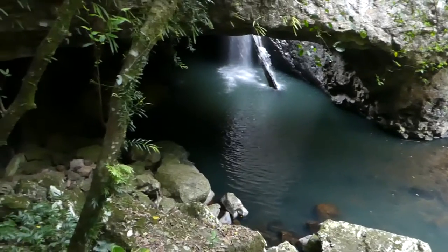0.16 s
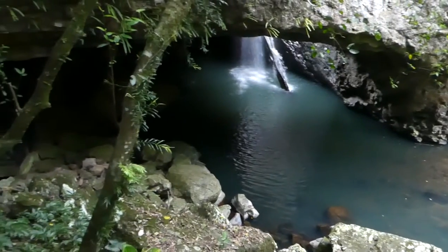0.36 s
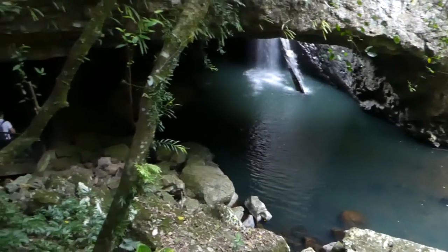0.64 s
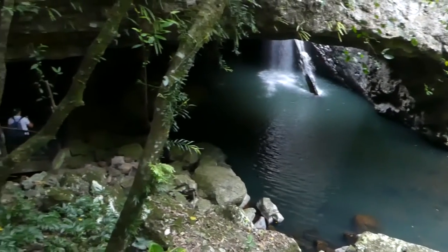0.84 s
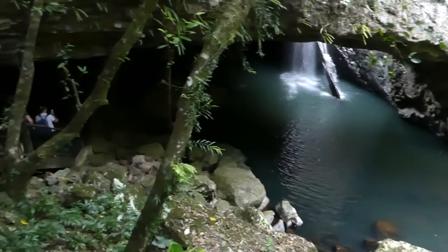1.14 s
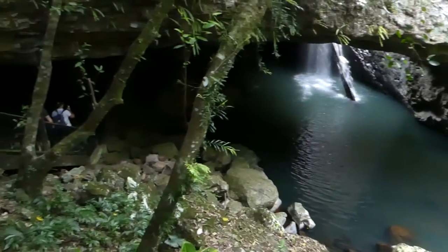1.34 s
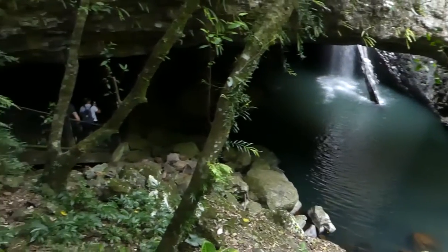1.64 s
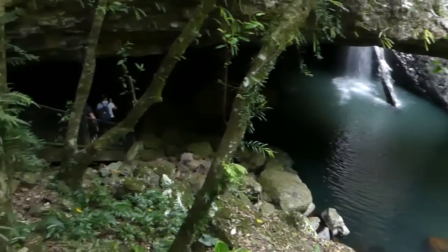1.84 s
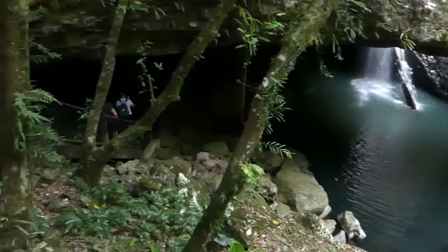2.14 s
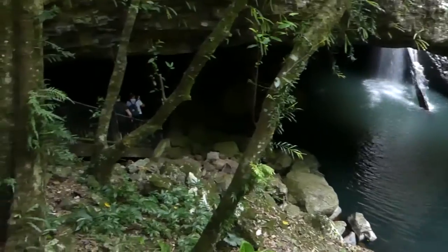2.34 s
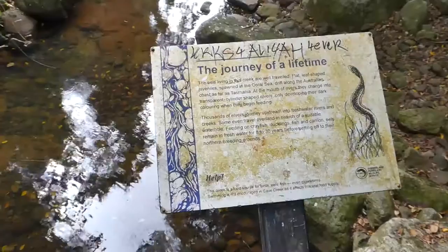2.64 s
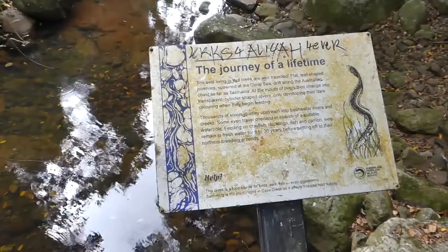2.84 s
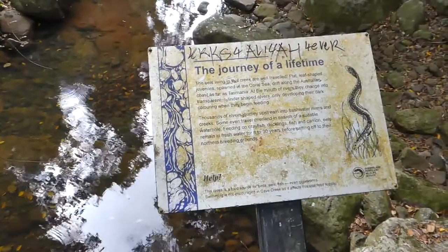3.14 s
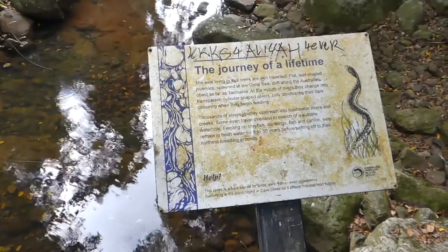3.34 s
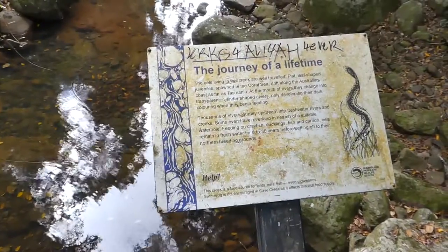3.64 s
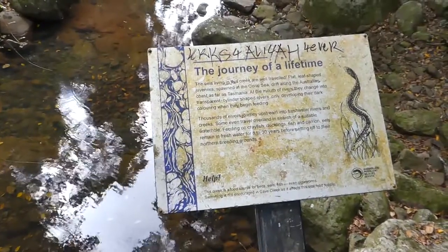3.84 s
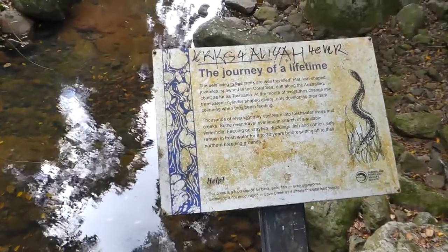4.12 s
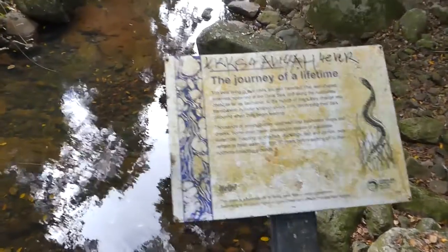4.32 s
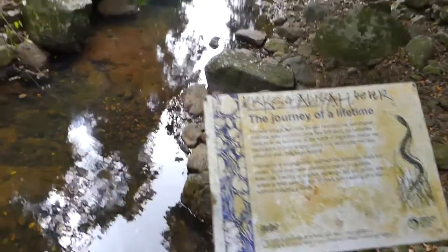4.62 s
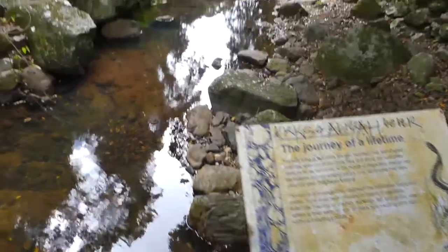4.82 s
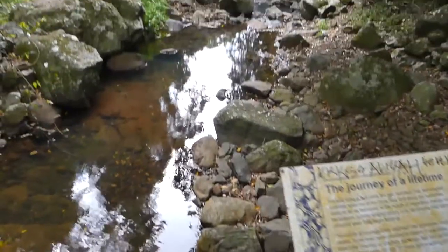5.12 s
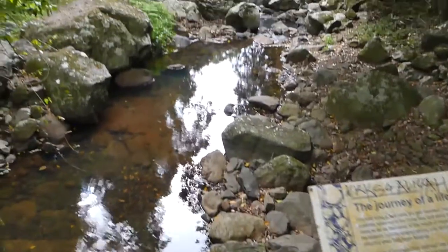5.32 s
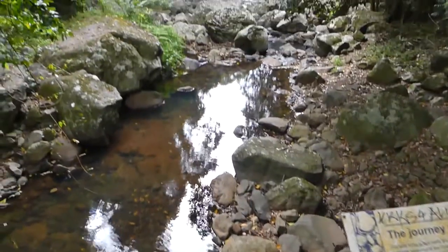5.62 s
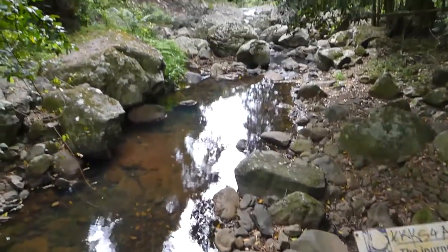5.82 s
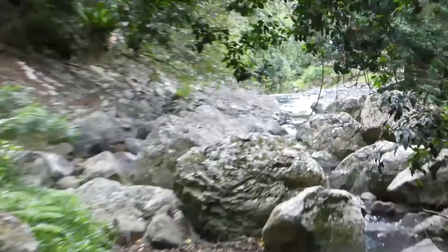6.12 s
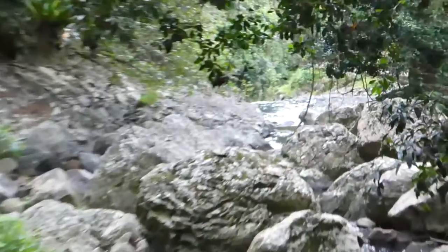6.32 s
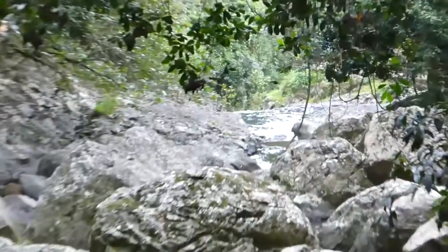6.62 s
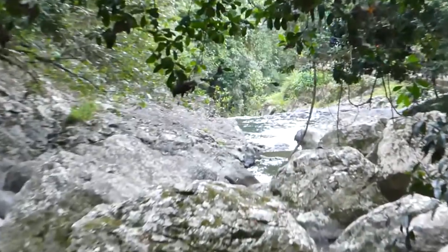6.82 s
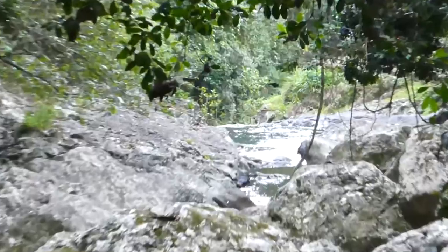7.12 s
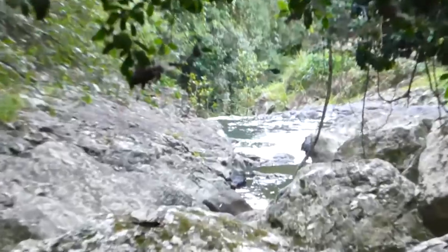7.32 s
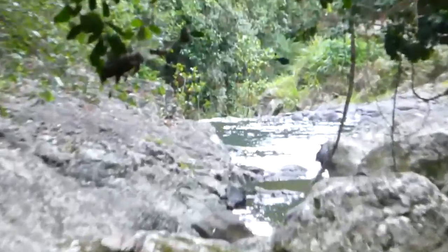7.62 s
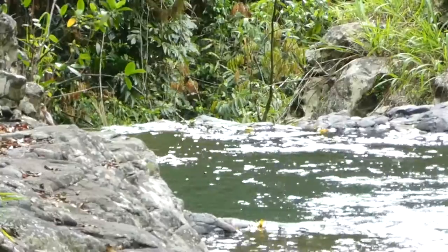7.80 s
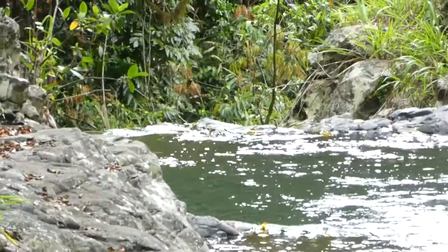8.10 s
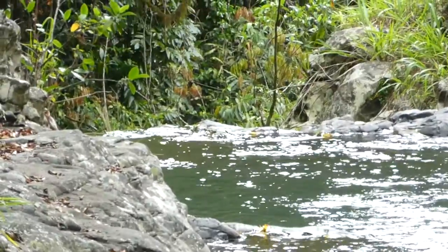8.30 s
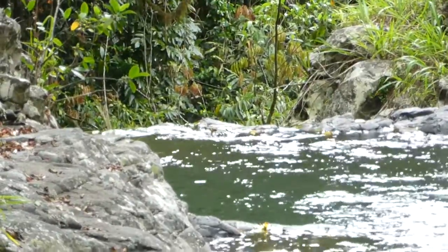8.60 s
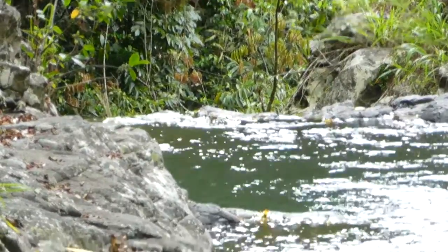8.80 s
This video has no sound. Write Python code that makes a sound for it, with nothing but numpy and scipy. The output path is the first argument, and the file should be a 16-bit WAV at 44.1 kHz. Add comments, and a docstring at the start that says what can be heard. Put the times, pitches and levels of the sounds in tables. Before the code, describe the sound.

A steady, loud waterfall drums into a cave pool with bright hissing spray and small bubbly slaps, drifting slightly right. It cuts off abruptly into a short silence. A far quieter rocky stream then starts suddenly, rushing softly with gurgles, round plops and small sloshes. One short dry knock comes midway, then the water sounds hollow and filtered for a while before opening up again. Outdoors, stereo microphone.

```python
"""A creek in the bush: first a waterfall in a cave, then open water among rocks.
The fall drums in its pool and hisses with spray, both made of patchy noise and swarms of ringing bubbles.
It stops, and after a short silence a stream rushes in, made the same way, with gulps, sloshes and one knock.
A faint high hiss comes twice. During the second, the stream turns hollow and a few narrow bands stand out;
a very faint low rumble of air also begins there and stays to the end."""
import sys
import numpy as np
from scipy import signal
from scipy.fft import rfft, irfft, next_fast_len
from scipy.io import wavfile
from scipy.ndimage import uniform_filter1d, map_coordinates

SR = 44100
rng = np.random.default_rng(int(sys.argv[2]) if len(sys.argv) > 2 else 0)


def transcribe(signal):
    """Save signal, clipped to [-1, 1], as a 16-bit WAV file at the path in sys.argv[1]."""
    frames = np.atleast_2d(signal).T
    limited = np.clip(frames, -1, 1)
    pcm = np.round(limited * 32767).astype(np.int16)
    wavfile.write(sys.argv[1], SR, pcm)


N = 394694

# Tone of the water drumming in the cave pool: pitch_hz, level_db (relative)
POOL_TONE = [(25, -54.5), (60, -46.5), (100, -25), (200, -12), (320, -4.3), (430, -6), (540, 1.7),
             (690, 2.7), (800, 0.5), (880, -0.4), (1100, -0.5), (1430, -29.5), (2400, -120)]
# Tone of the hissing spray: pitch_hz, level_db (relative)
SPRAY_TONE = [(650, -39.5), (1100, -5), (1450, -3.5), (1800, -4), (2200, -1.3), (2900, 0.26), (4000, -2),
              (5850, -4), (7980, -8.5), (9740, -4.5), (12000, -12.5), (14000, -19), (15500, -25.5)]
# Surges of the spray: time_s, level_db (over its usual level)
SPRAY_SURGES = [(0.05, 0.1), (.16, 0), (.33, 0.2), (.49, 0.5), (.65, 0.4), (.755, 1.5), (.88, -0.3),
                (.95, 0.6), (1.04, -.5), (1.17, 0.5), (1.36, .5), (1.5, -0.5), (1.61, 0.3), (1.79, 0.45),
                (2.17, -0.6), (2.28, -0.4), (2.37, .5), (2.46, -0.3)]
# How wide the cave sounds: pitch_hz, side_minus_mid_db
CAVE_WIDTH = [(60, 8.5), (99, 1.5), (160, 0), (270, -7), (450, -10), (740, -13.5), (1220, -9.5),
              (2010, -10.5), (3330, -12.5), (5500, -10.5), (9080, -12), (15000, -2)]
# Heavy clumps of water slapping the pool: start_s, starting_pitch_hz, peak_db
POOL_SLAPS = [(.042, 2430, -25), (.213, 3886, -31), (.348, 1421, -26), (1.164, 2121, -26.5),
              (1.203, 1916, -32), (1.271, 1162, -29), (1.338, 2830, -25), (1.437, 1760, -29),
              (1.630, 2400, -28.5), (1.821, 4231, -31.5)]
# Tone of the stream over rocks: pitch_hz, level_db (relative)
STREAM_TONE = [(25, -41), (65, -28), (123, -14), (200, -6.5), (315, -3), (520, -0.5), (900, -1.5),
               (1440, -4), (2800, -6), (4900, -11), (6800, -16.5), (8100, -21), (9900, -20.5), (12500, -30),
               (15500, -37.5)]
# How wide the creek sounds: pitch_hz, side_minus_mid_db
CREEK_WIDTH = [(60, 7), (110, 4), (200, 2), (380, -4.5), (700, -7.5), (1290, -8.5), (2380, -10),
               (4400, -10), (8120, -8.5), (15000, -2)]
# Strength of the stream, before its flutter: time_s, level_db
STREAM_FLOW = [(2.85, -39.5), (4.2, -39.0), (4.7, -39.5), (5.5, -39), (6.1, -38.5), (7.3, -39.5),
               (7.8, -39), (8.9, -39.5)]
# Small waves folding over rocks: start_s, length_s, centre_pitch_hz, spread_octaves, level_db
WAVE_FOLDS = [(3.55, .16, 2700, .08, -52), (5.859, .1, 1520, 0.66, -48), (6.524, 0.074, 1740, 0.15, -45.5),
              (6.628, .15, 1710, 0.086, -50), (6.69, .08, 400, 0.18, -52), (6.788, 0.065, 960, .08, -54),
              (6.914, .06, 1420, .04, -50), (7.169, 0.052, 930, 0.195, -46), (7.76, 0.14, 2220, 0.14, -51),
              (7.924, 0.036, 876, 0.28, -41.5), (8.032, .16, 1096, 0.2, -57),
              (8.192, 0.083, 626, 0.19, -51), (8.35, 0.18, 515, 0.077, -50.5),
              (8.578, .12, 1580, 0.23, -48)]
# Tone of the faint high hiss: pitch_hz, level_db (relative)
HISS_TONE = [(4000, -51.5), (9000, -9.5), (12000, 1.5), (15500, -8.0)]
# Large air pockets closing: start_s, starting_pitch_hz, peak_db, fall_by_60_db_s
AIR_POCKETS = [(4.521, 1404, -41, .07), (4.837, 860, -41, .07), (4.948, 890, -39, .06),
               (5.210, 970, -38, .06), (5.212, 1100, -42, .06), (5.245, 485, -40, .06),
               (5.308, 1085, -41, .11), (5.352, 552, -39, .08), (5.362, 1140, -41, .07),
               (5.433, 330, -40, 0.096), (5.450, 670, -40, .06), (5.690, 650, -36, 0.054),
               (5.885, 684, -39, .08), (6.042, 1390, -42, .09), (6.136, 325, -36.5, 0.093),
               (6.266, 402, -38, .06), (6.269, 193, -39, 0.14), (6.325, 225, -42, .07),
               (6.485, 590, -38, .05), (6.537, 1435, -40, .08), (6.670, 434, -35, .09),
               (6.773, 560, -37, .05), (6.789, 345, -44, .06), (7.073, 212, -38, 0.045),
               (7.076, 450, -38, .05), (7.178, 640, -37, .06), (7.180, 903, -34, 0.093),
               (7.188, 2080, -40, .05), (7.530, 1020, -38, .08), (7.702, 192, -46, 0.087),
               (7.755, 1112, -36.5, .06), (7.844, 344, -41, 0.055), (7.929, 703, -39, .06),
               (7.934, 982, -36, 0.076), (7.966, 298, -42, .09), (7.967, 876, -43, .06),
               (8.046, 1150, -42, .06), (8.138, 1150, -41, .07), (8.245, 644, -41, .13),
               (8.395, 490, -40, .12), (8.424, 516, -44, .13), (8.654, 1435, -43, .07)]
# What the knock rings with: pitch_hz, level_db (relative), fall_by_60_db_s
KNOCK_RINGS = [(840, -6, 0.022), (1100, -12, .01), (1690, -4, .016), (2600, -9, .006)]
# Overall tone of the knock: pitch_hz, gain_db
KNOCK_TONE = [(120, -40), (700, -1), (2000, -1), (7000, -14), (12000, -34.5)]
# Tone of the low rumble: pitch_hz, level_db (relative)
RUMBLE_TONE = [(20, -2), (55, -2), (120, -2.0), (400, -60), (1000, -120)]
# Broad scoop of the hollow colour: pitch_hz, gain_db
HOLLOW_SCOOP = [(90, -1), (150, -7.5), (210, -3.5), (610, -3.5), (670, -13), (1270, -10.5), (1700, -10),
                (2100, -10.5), (2380, -19), (3000, -19), (3850, -20), (4300, -17.5), (4850, -19.5),
                (5060, -5), (5350, -3), (5630, -9), (5850, -3), (7500, -2), (14000, -2)]
# Narrow bands left standing in the scoop: centre_pitch_hz, width_hz, added_gain_db
HOLLOW_RIDGES = [(954, 70, 7), (1450, 49, 7.6), (5260, 93, 2.5), (12900, 500, 3.5)]

FALL_END, CREEK_START, KNOCK_START = 2.569, 2.845, 5.9535  # seconds
HOLLOW_START, HOLLOW_END = 6.023, 7.64  # seconds
TOP_HZ = 15550  # almost nothing is heard above this
POOL_DB, SPRAY_DB = -33, -23.5
FLUTTER_DB = 0.43  # quick chance wavering of the stream


def amp(db):
    """Turns decibels into a gain."""
    return 10 ** (np.asarray(db) / 20)


def unit(x):
    """Scales a sound to an average (rms) strength of 1."""
    return x / np.sqrt(np.mean(x ** 2) + 1e-20)


def along(points, hz):
    """Reads a curve of (pitch, value) points on a log pitch axis."""
    f, v = np.transpose(points)
    return np.interp(np.log(hz + 1), np.log(f + 1), v)


def over_time(points):
    """Reads a curve of (time, value) points at every sample."""
    return np.interp(np.arange(N) / SR, *np.transpose(points))


def ramp(start, length):
    """Rises from 0 to 1 over a length in seconds."""
    return np.clip((np.arange(N) / SR - start) / length, 0, 1)


def wobble(rate):
    """A smooth random curve with a new random point rate times a second."""
    points = rng.standard_normal(int(N * rate / SR) + 4)
    return map_coordinates(points, [np.arange(N) * rate / SR])


def filtered(x, response):
    """Changes the strength of each pitch in a sound by a given response."""
    m = next_fast_len(N + 8192)
    return irfft(rfft(x, m) * response(np.fft.rfftfreq(m, 1 / SR)), m)[..., :N]


def churn(patchy_db):
    """White mid and side noise whose bands swell and sink in patches, as jets of water break up."""
    bands = signal.stft(rng.standard_normal((2, N)), nperseg=512)[2]
    patches = rng.standard_normal(bands.shape[1:])
    patches = uniform_filter1d(patches, size=5, axis=0)  # smooth over pitch
    patches = uniform_filter1d(patches, size=10, axis=1)  # smooth over time
    depth = patchy_db / (1 + np.arange(len(patches)) / len(patches) * 2)  # fine spray is smoother
    gain = amp(depth[:, None] * unit(patches))
    return unit(signal.istft(bands * gain, nperseg=512)[1][:, :N])


def bubbles(count, low_hz, high_hz, cycles, spread_db):
    """Mid and side of a swarm of bubbles: each rings for some cycles and rises in pitch."""
    when, bore, size, place, life = rng.random((count, 5)).T[..., None]
    hz = low_hz * (high_hz / low_hz) ** bore
    step = np.arange(int(np.clip(2 * cycles * SR / low_hz, 16, 4e6 / count)))
    turns = hz * step / SR
    age = turns / (cycles * (.5 + life))
    tone = np.sin(2 * np.pi * turns * (1 + 0.034 * np.minimum(age, 2)))
    ring = tone * np.exp(-3 * age) * (1 - np.exp(-turns))  # soft start, then dying away
    ring *= amp(-spread_db * np.log(np.maximum(size, .01)))
    at = ((when * N).astype(int) + step).ravel()
    mid = np.bincount(at, ring.ravel(), N)[:N]
    side = np.bincount(at, (ring * (place - .5)).ravel(), N)[:N]
    return np.array([unit(mid), unit(side)])


def stereo(pair, spectrum, width):
    """Colours a mid and side pair and turns it into left and right, mid at rms 1."""
    def response(hz):
        return amp(along(spectrum, hz)) * np.array([np.ones_like(hz), amp(along(width, hz))])
    mid, side = filtered(pair, response)
    return np.array([mid + side, mid - side]) / np.std(mid)


def waterfall():
    """The falling column drums in the pool; its spray hisses in uneven surges; both drift to the right."""
    surge_db = over_time(SPRAY_SURGES) + 0.49 * wobble(22.03)
    pool = churn(patchy_db=0.13)
    pool += amp(-22.5) * bubbles(count=2500, low_hz=203.5, high_hz=1103, cycles=10, spread_db=1.5)
    spray = churn(patchy_db=0.97)
    spray += amp(-13.5) * bubbles(count=20000, low_hz=1170, high_hz=11700, cycles=2.35, spread_db=-0.5)
    clumps = amp(-19.0) * bubbles(count=1500, low_hz=990, high_hz=4130, cycles=10.3, spread_db=1)
    low = amp(POOL_DB + 0.13 * wobble(8.8)) * stereo(pool, POOL_TONE, CAVE_WIDTH)
    high = amp(SPRAY_DB + surge_db) * stereo(spray + clumps, SPRAY_TONE, CAVE_WIDTH)
    drift = np.array([[-1], [1]]) * ramp(0, FALL_END)  # left sinks, right grows
    return low * amp(0.87 * drift) + high * amp(.6 * drift)


def slaps(life=.05, attack=.003, rise=.6):
    """A clump of falling water traps a bubble that rings briefly through the roar, rising in pitch."""
    out, t = np.zeros(N + SR), np.arange(SR // 8) / SR
    shape = (1 - np.exp(-t / attack)) ** 2 * amp(-60 * t / life)
    for start, hz, db in POOL_SLAPS:
        tone = np.sin(2 * np.pi * (hz * t * (1 + rise * t) + rng.random()))
        out[round(start * SR):][:len(t)] += amp(db) * shape / shape.max() * tone
    return out[:N]


def stream():
    """White water among the rocks: a steady rush, gurgling bubbles and small splashes."""
    flow_db = over_time(STREAM_FLOW) + FLUTTER_DB * wobble(11)
    rush = churn(patchy_db=0.6)
    gurgle = amp(-21.5) * bubbles(count=2200, low_hz=301.0, high_hz=2430, cycles=10.4, spread_db=2.5)
    splash = amp(-17.0) * bubbles(count=7000, low_hz=1494, high_hz=11100, cycles=3.9, spread_db=2.5)
    return amp(flow_db) * stereo(rush + gurgle + splash, STREAM_TONE, CREEK_WIDTH)


def sloshes(cycles=42, count=40):
    """A small wave folds over a rock and sheds a cloud of ringing bubbles that swells and dies."""
    out, t = np.zeros(N + SR), np.arange(SR // 2) / SR
    for start, length, centre_hz, octaves, db in WAVE_FOLDS:
        born = length * rng.beta(2, 2, size=(count, 1))
        hz = centre_hz * 2 ** (octaves * rng.standard_normal((count, 1)))
        turns = hz * np.maximum(t - born, 0)
        fade = amp(-60 * turns / cycles) * (1 - np.exp(-turns)) ** 3  # falls 60 dB in that many cycles
        cloud = (np.sin(2 * np.pi * turns) * fade).sum(axis=0)
        strength = np.sqrt(np.sum(cloud ** 2) / (length * SR))
        out[round(start * SR):][:len(t)] += amp(db) * cloud / strength
    return out[:N]


def high_hiss(db=-67):
    """Coloured noise that hisses faintly, once briefly and again, set 3 dB lower, in the hollow stretch."""
    hiss = stereo(rng.standard_normal((2, N)), HISS_TONE, [(10000, -4.0)])
    first = ramp(4.0, .2) - ramp(4.62, .15)
    second = ramp(HOLLOW_START, .02) - ramp(HOLLOW_END, .02)
    return amp(db) * hiss * (first + amp(-3) * second)


def gulps(attack=0.004, rise=0.93):
    """An air pocket closes into one large bubble, which rings with a round plop and rises in pitch."""
    out, t = np.zeros(N + SR), np.arange(SR // 5) / SR
    for start, hz, db, life in AIR_POCKETS:
        shape = (1 - np.exp(-t / attack)) ** 2 * amp(-60 * t / life)
        ring = shape * np.sin(2 * np.pi * (hz * t * (1 + rise * t) + rng.random()))
        out[round(start * SR):][:len(t)] += amp(db) * ring / shape.max()
    return out[:N]


def knock(db=-21):
    """A short, dry knock, like a stone tipping against another: a few fading tones and a crack of noise."""
    t = np.maximum(np.arange(N) / SR - KNOCK_START, 0)
    ring = sum(amp(level - 60 * t / life) * np.sin(2 * np.pi * hz * t) for hz, level, life in KNOCK_RINGS)
    crack = amp(-4 - 60 * t / 0.005) * rng.standard_normal(N) * (t > 0)
    return amp(db) * filtered(ring + crack, lambda hz: amp(along(KNOCK_TONE, hz)))


def rumble():
    """A faint low rumble of air on the open river bank: low noise, a little stronger towards the end."""
    air = stereo(rng.standard_normal((2, N)), RUMBLE_TONE, [(50, -8)])
    return amp(-76 + 3 * ramp(8.1, .3) + 2 * wobble(6.1)) * air


def hollow(hz):
    """Gain of the hollow colour: a broad scoop with narrow bands left standing in it."""
    ridges_db = sum(db * np.exp(-.5 * ((hz - centre) / width) ** 2) for centre, width, db in HOLLOW_RIDGES)
    return amp(along(HOLLOW_SCOOP, hz) + ridges_db)


def scene():
    """The cave, a short silence, then the creek."""
    cave = (waterfall() + slaps()) * (1 - ramp(FALL_END - .018, .018))
    creek = stream() + sloshes() + high_hiss() + gulps() + knock()
    return cave + creek * ramp(CREEK_START, .001) + rumble() * ramp(HOLLOW_START, .005)


def record(dry):
    """Turns the sound hollow for a stretch and cuts the treble steeply above TOP_HZ throughout."""
    hollow_mix = ramp(HOLLOW_START, .002) - ramp(HOLLOW_END - .005, .004)
    mixed = dry * (1 - hollow_mix) + filtered(dry, hollow) * hollow_mix
    return filtered(mixed, lambda hz: 1 / (1 + (hz / TOP_HZ) ** 200))


dry = scene()
out = record(dry)
transcribe(out)
```